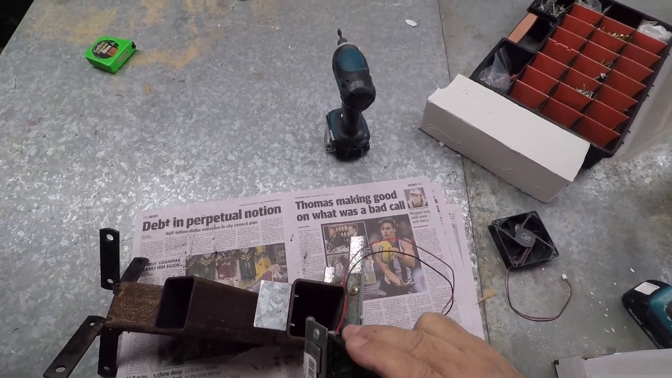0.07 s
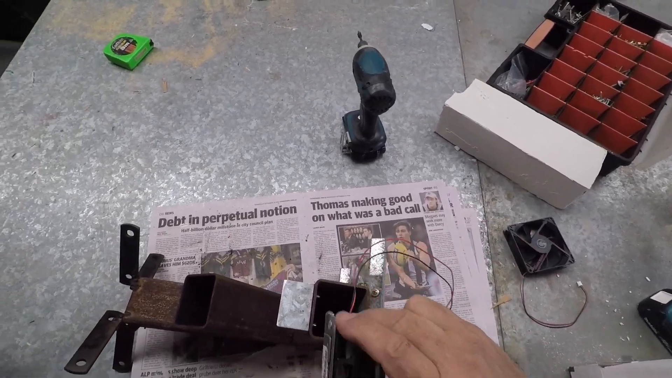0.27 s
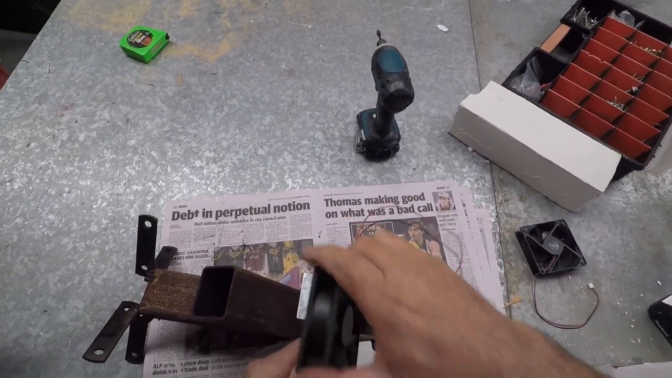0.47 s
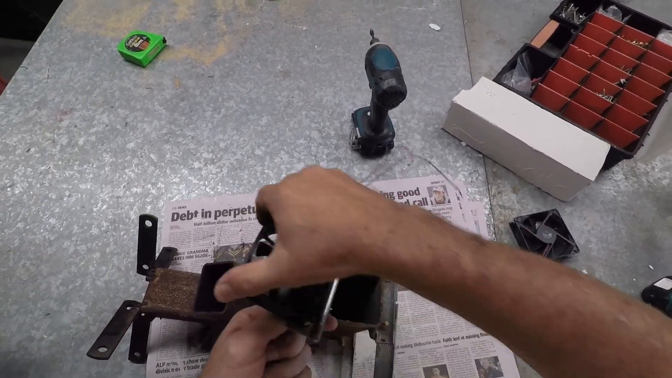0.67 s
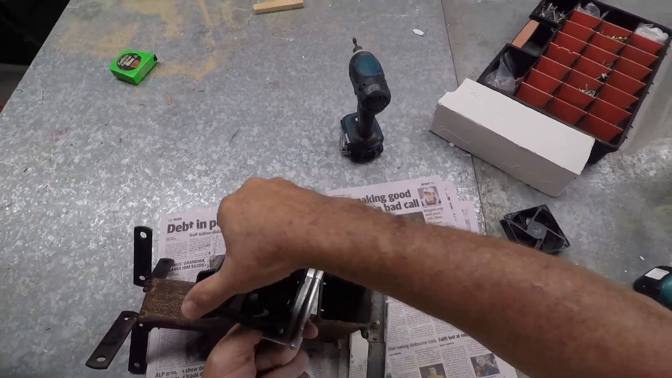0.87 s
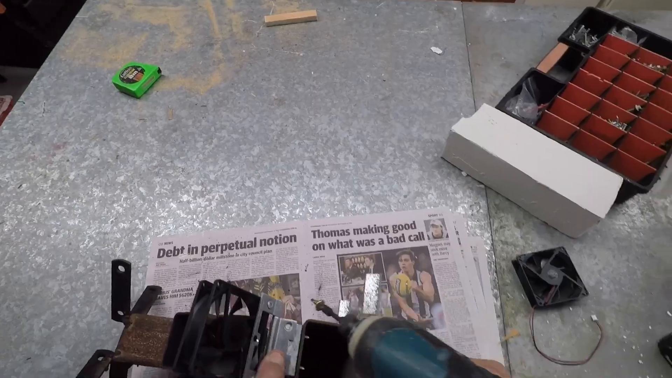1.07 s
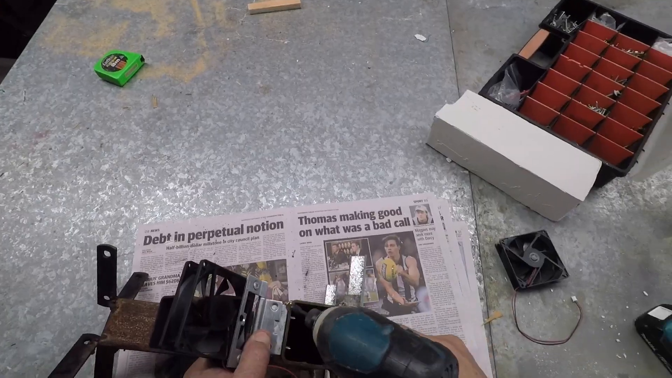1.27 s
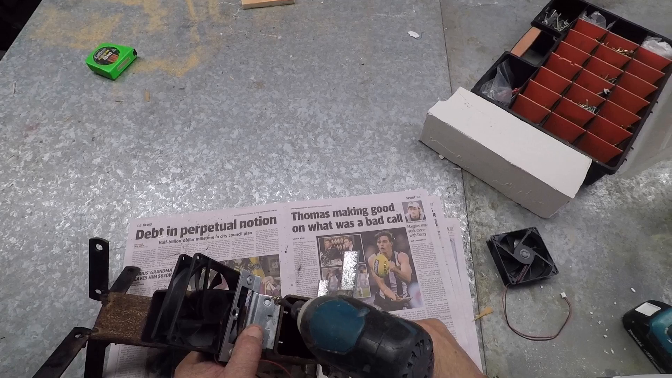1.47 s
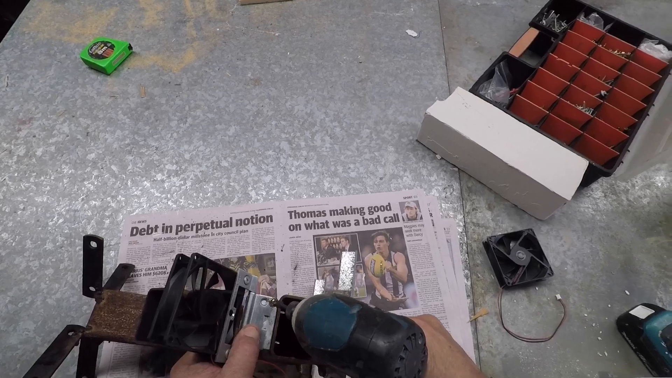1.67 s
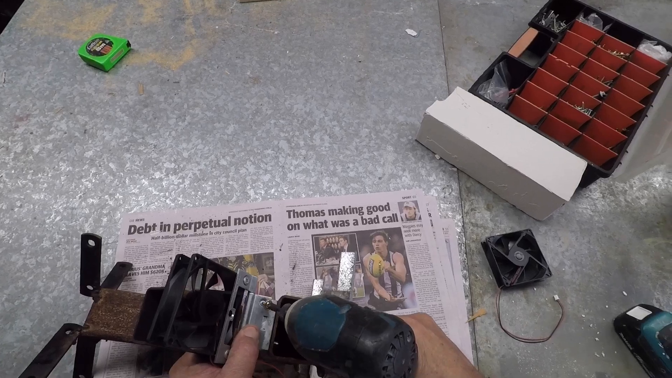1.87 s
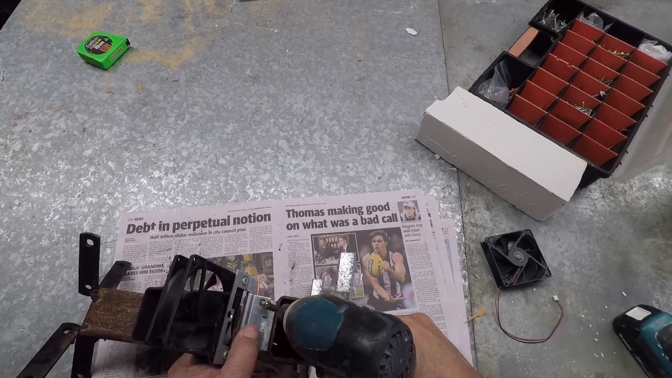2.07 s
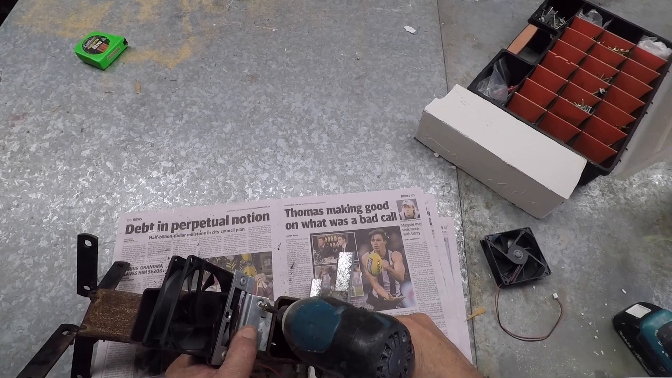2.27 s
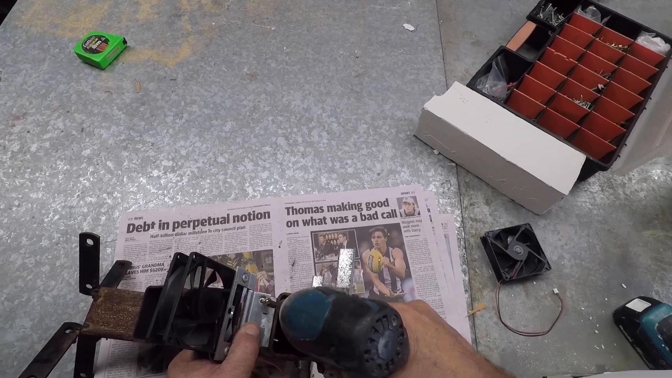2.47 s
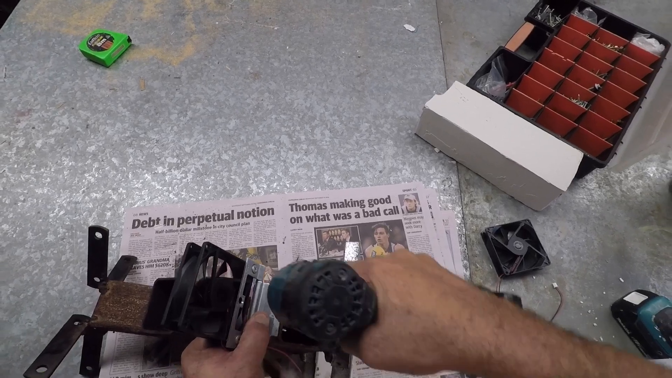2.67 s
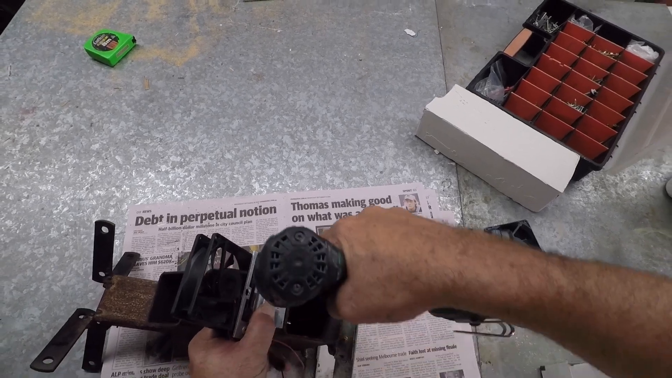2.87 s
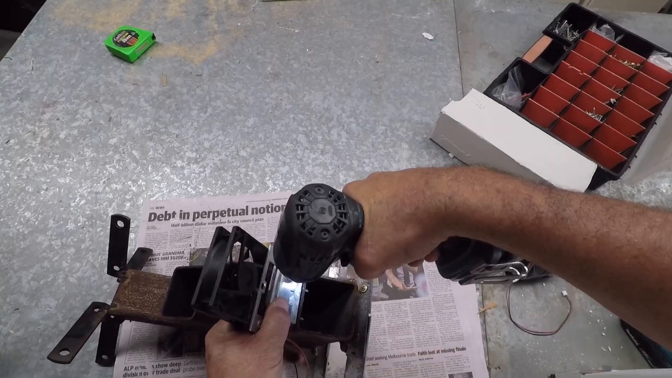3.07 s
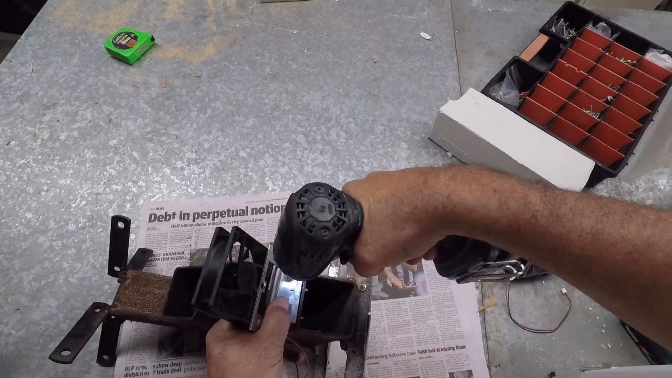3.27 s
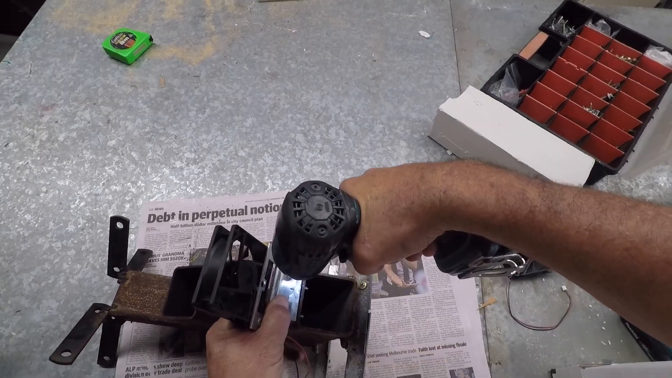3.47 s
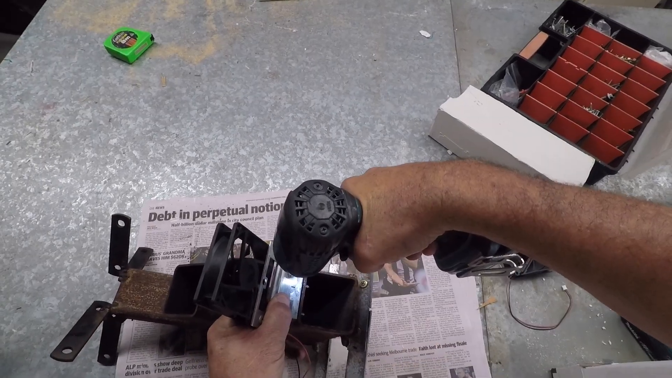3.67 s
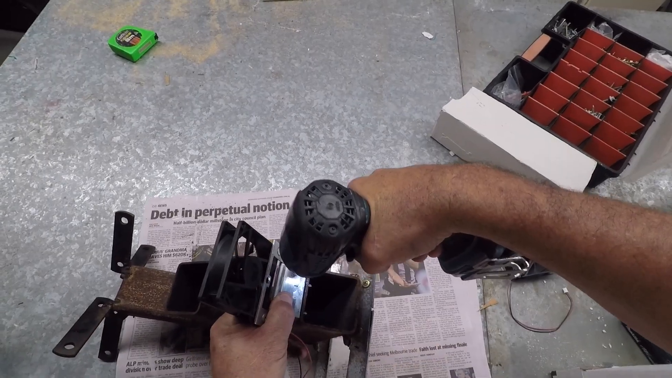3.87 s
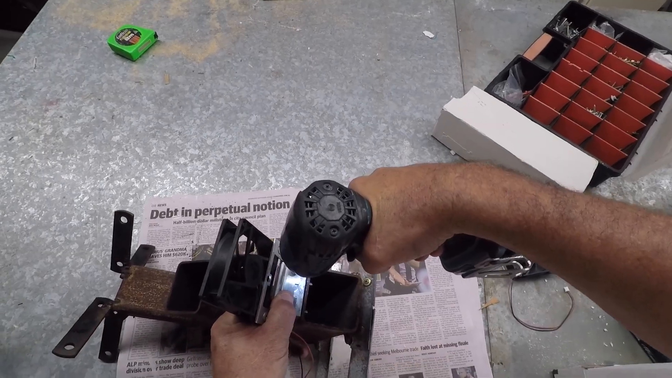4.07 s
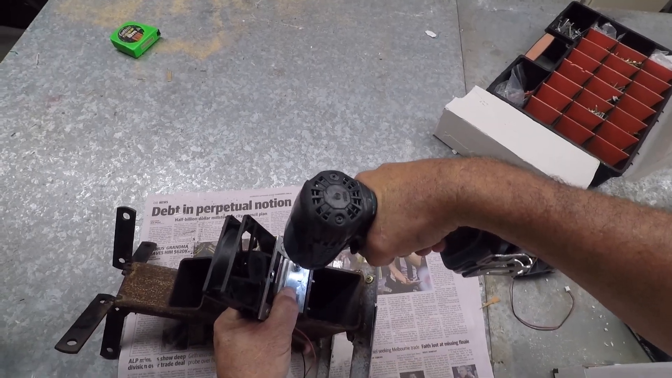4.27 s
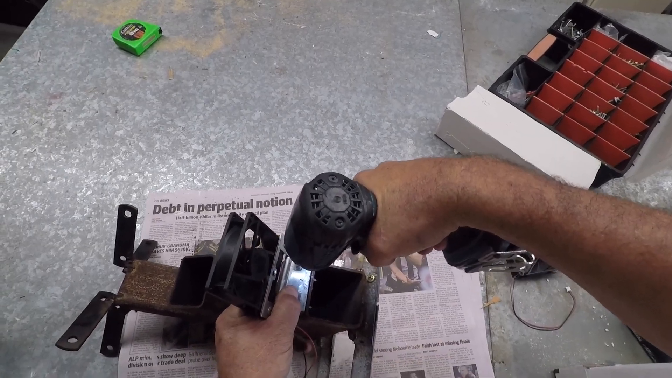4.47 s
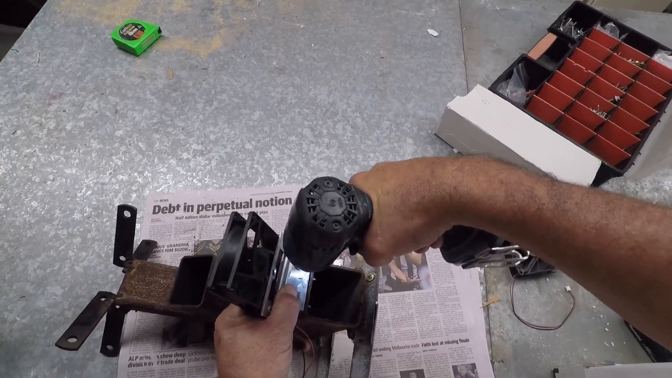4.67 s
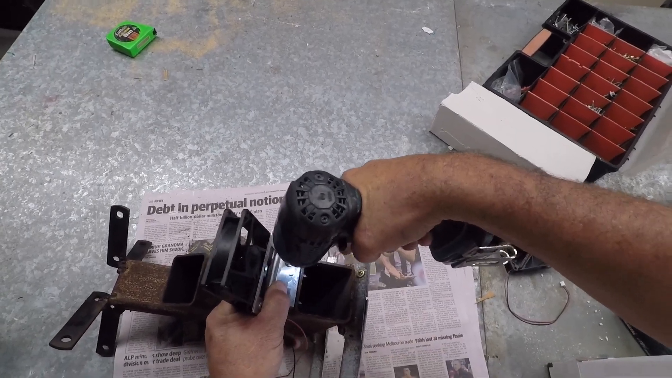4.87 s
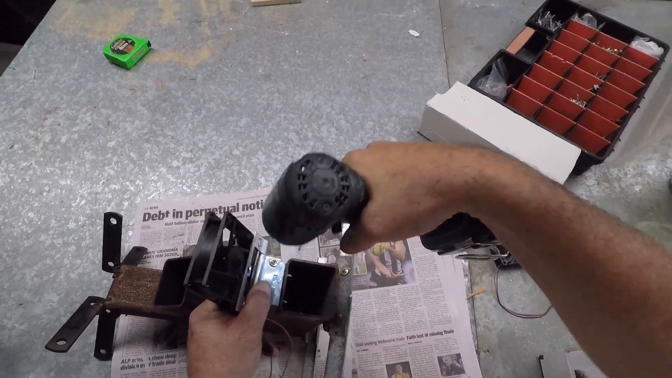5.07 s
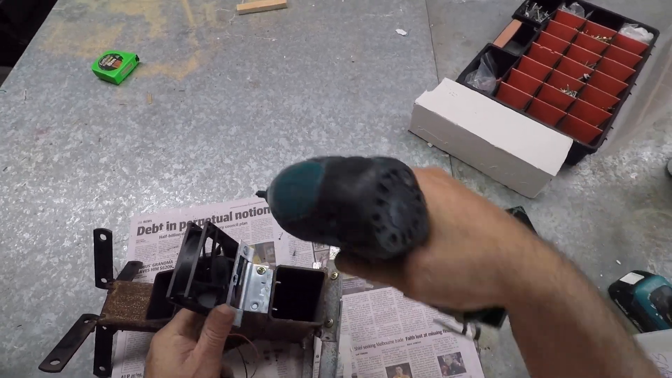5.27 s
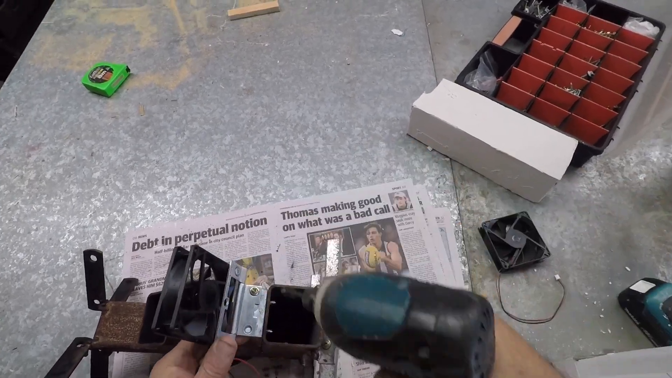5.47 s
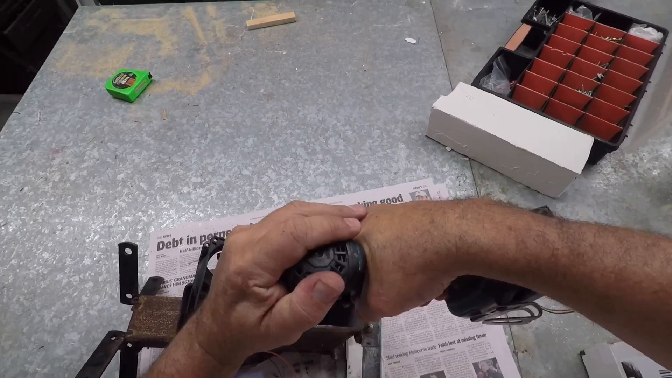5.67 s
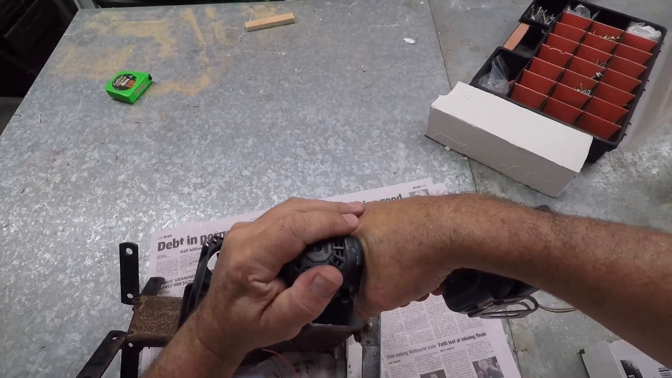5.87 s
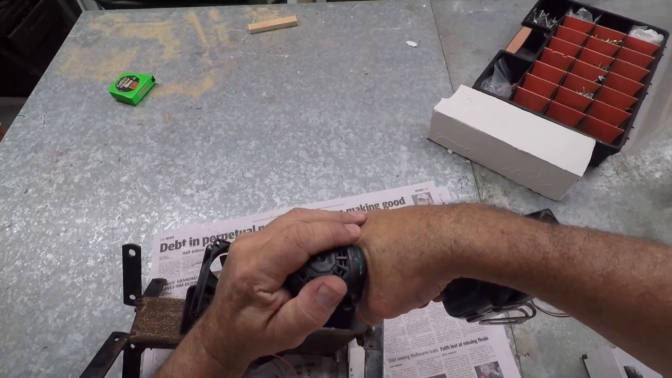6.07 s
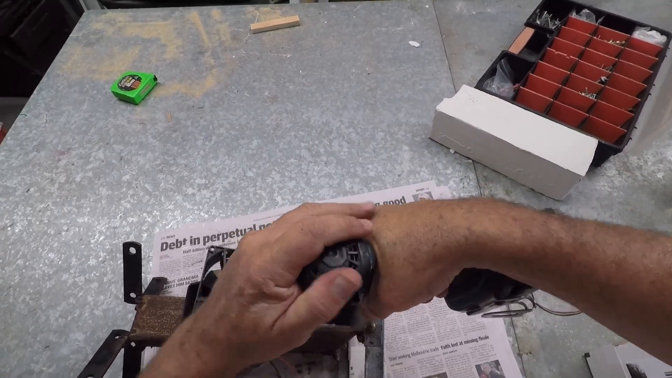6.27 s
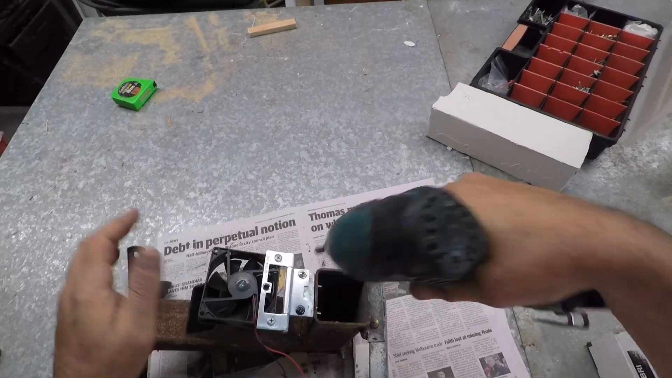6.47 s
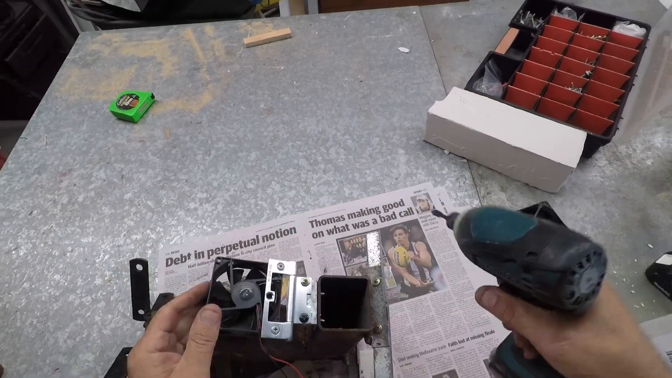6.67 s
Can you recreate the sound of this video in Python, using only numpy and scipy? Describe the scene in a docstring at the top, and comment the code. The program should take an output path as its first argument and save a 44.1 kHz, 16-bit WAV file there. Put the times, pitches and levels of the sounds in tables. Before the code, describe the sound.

Over a low hum of workshop air come a tiny motor blip and a faint tick. A cordless impact driver then whines for nearly two seconds, sagging under load and ending in a quick metallic hammering as the screw seats in a steel hinge. After a few light clicks, a second, shorter run strains, speeds up and hammers tight. The microphone is close to the bench.

```python
"""Impact driver at a workbench

A small workshop with a low hum of air, the stereo microphone close to the bench. After a snatch of
motor sound, a cordless impact driver drives two screws into a steel hinge. The motor whines and sags
under load while its gears grow louder; as each screw seats, the hammer strikes, the steel rings and
the bench booms. All sits in the centre, with only the top treble of the reflections spreading wide."""
import sys
import numpy as np
from scipy import signal
from scipy.fft import rfft, irfft, next_fast_len
from scipy.io import wavfile

SR = 44100
rng = np.random.default_rng(int(sys.argv[2]) if len(sys.argv) > 2 else 0)


def store_wav(level_fs):
    """Save 16-bit WAV to argv[1]."""
    pcm = np.round(np.clip(np.atleast_2d(level_fs), -1, 1) * 32767)
    wavfile.write(sys.argv[1], SR, pcm.T.astype(np.int16))


N = 296307
TIME = np.arange(N) / SR

# One trigger pull a screw: start_s, seat_s, release_s, then the base levels
# whir_db, whine_db, fan_db, gear_db, shudder_db
TRIGGER_PULLS = [(2.985, 4.59, 4.79, -20.5, -39.5, -30.5, -22, -27.5),
                 (5.588, 6.073, 6.205, -21, -42, -27, -21.5, -32)]
# Resonances of the driver's housing, main one first: pitch_hz, width_hz, relative_db
HOUSING_RESONANCES = [(4350, 400, -38), (9950, 400, -50)]
# Spectrum of a hard contact: frequency_hz, relative_db
CRACK_SPECTRUM = [(200, -29), (700, -2.5), (1600, 7.5), (3000, 0), (4300, 8.5), (6200, -2), (8000, -6),
                  (11000, -17), (15500, -11.5)]
# Modes of the steel hinge: pitch_hz, relative_db, t60_s
HINGE_MODES = [(1740, 9, 0.018), (2015, 8.5, 0.23), (2560, -1, .08), (3190, -5, 0.163), (3580, 4, .06),
               (3930, -4, .05), (4150, 17, 0.18), (4870, -16, 0.13), (4780, 12, 0.051), (5230, -1, .05),
               (6720, -38, .08)]


def gain_of(db):
    """Decibels to a factor."""
    return 10 ** (np.asarray(db) / 20)


def unit_rms(x):
    """Scales to rms 1."""
    return x / np.sqrt(np.mean(x ** 2) + 1e-20)


def value_at(points, hz):
    """Interpolates a table on a log-frequency axis."""
    table_hz, values = np.transpose(points)
    return np.interp(np.log(hz + 1), np.log(table_hz + 1), values)


def coloured(x, spectrum):
    """Filters by a spectrum table."""
    size = next_fast_len(N + 4096)
    response = gain_of(value_at(spectrum, np.fft.rfftfreq(size, 1 / SR)))
    return irfft(rfft(x, size) * response, size)[:N]


def noise(spectrum):
    """Noise of rms 1 with this spectrum."""
    return unit_rms(coloured(rng.standard_normal(N), spectrum))


def wander(rate_hz):
    """A smooth random curve of rms 1."""
    return unit_rms(np.interp(TIME * rate_hz, np.arange(8000), rng.standard_normal(8000)))


def bump(at, width, centre):
    """A bell curve of height 1."""
    return np.exp(-((at - centre) / width) ** 2)


def strike(times_s, db, response):
    """Sets off the same response at each time."""
    impulses = np.zeros(N)
    impulses[np.round(np.asarray(times_s) * SR).astype(int)] = gain_of(db)
    return signal.oaconvolve(impulses, response)[:N]


def decay(t60_s):
    """Half a second of exponential decay."""
    return gain_of(-60 * TIME[:SR // 2] / t60_s)


def ring(modes):
    """A struck body rings as a sum of dying sines."""
    age_s = TIME[:SR // 2]
    return sum(gain_of(db) * decay(t60_s) * np.sin(2 * np.pi * hz * age_s) for hz, db, t60_s in modes)


def tones(cycles, levels_db, flutter=.15):
    """Harmonics locked to a shaft, each fluttering in strength; rms near 1."""
    weights = gain_of(levels_db) / np.linalg.norm(gain_of(levels_db))
    position = np.arange(len(cycles)) * 160 / SR  # 160 new strengths a second
    shivers = rng.standard_normal((len(weights), 1024))
    total = 0
    for k, (weight, shiver) in enumerate(zip(weights, shivers), 1):
        strength = weight * (1 + flutter * np.interp(position, np.arange(1024), shiver))
        total += strength * np.sin(2 * np.pi * (k * cycles + rng.random()))
    return np.sqrt(2) * total


def room_air():
    """The hum of air dips briefly after the blip, sinks under each screw and creeps back."""
    # Workshop air: frequency_hz, relative_db
    air_spectrum = [(18, -44), (30, -31), (80, -34), (104, -41), (138, -2.5), (202, -1.5), (243, -9),
                    (307, -9.5), (389, -12.5), (420, -14.5), (505, -17.5), (1140, -24.5), (1330, -24),
                    (2800, -34), (5500, -35.5), (10200, -35), (15500, -44)]
    sink_db, recover_db_per_s = -14.5, 11.5
    level_db = -48.5 - 32 * bump(TIME, width=0.013, centre=0.98)
    for start_s, _, release_s, *_ in TRIGGER_PULLS:
        recovered_db = recover_db_per_s * np.maximum(TIME - release_s, 0)
        level_db += (TIME > start_s) * np.minimum(sink_db + recovered_db, 0)
    return gain_of(level_db) * noise(air_spectrum)


def handling_rumble():
    """Handling makes spells of low, uneven rumble."""
    # Rumble: frequency_hz, relative_db
    rumble_spectrum = [(15, 4.5), (40, -0.5), (100, -2.5), (140, -10), (220, -14.5), (500, -26),
                       (1500, -29.5), (4500, -39), (8000, -51)]
    # Spells of handling: start_s, end_s, level_db
    spells = [(0, .96, -62), (3.003, 6.718, -37.5)]
    level = sum(gain_of(db) * ((TIME >= start_s) & (TIME < end_s)) for start_s, end_s, db in spells)
    return level * gain_of(2 * wander(19)) * noise(rumble_spectrum)


def workshop_reflections(x):
    """Dense reflections from bench and walls, each band dying at its own speed."""
    # Reverberation of the room: frequency_hz, t60_s
    decay_times = [(100, 1), (400, 0.5), (1500, 0.4), (4500, 0.38), (9000, 0.18), (15000, 0.44)]
    size = SR // 2
    echoes = rng.standard_normal(size) * (rng.random(size) < .1) * (TIME[:size] > .004)
    hz, age_s, bands = signal.stft(echoes, SR, nperseg=256)
    fade = gain_of(-60 * age_s / value_at(decay_times, hz)[:, None])
    tail = signal.istft(bands * fade, SR, nperseg=256)[1]
    return signal.oaconvolve(x, tail / np.linalg.norm(tail))[:N]


def ticks():
    """Light contacts of trigger, bit and steel: a click and a damped ring."""
    # Contacts: start_s, relative_db
    contacts = [(0.95, -48), (1.905, -49), (2.962, -73), (4.892, -36), (4.92, -40), (5.022, -59),
                (5.076, -56), (5.561, -50.5), (6.355, -59), (6.421, -48.5), (6.671, -56)]
    start_s, db = np.transpose(contacts)
    click = noise(CRACK_SPECTRUM) * strike(start_s, db + 7, decay(t60_s=0.021))
    return click + strike(start_s, db - 20, ring(HINGE_MODES) * decay(t60_s=0.035))


def bench_boom(blows):
    """The blows pass through the vice into the bench top, a moment later."""
    # Modes of the bench: pitch_hz, relative_db, t60_s
    bench_modes = [(82.2, -11, 0.55), (116, 4, 0.099), (138.6, 0.5, 0.32), (181.6, -1.5, 0.33),
                   (225.4, -4.5, 0.14), (392, -8.5, 0.14), (620, -7, 0.12), (818.6, -8, 0.16)]
    # How well the bench radiates: frequency_hz, gain_db
    radiation = [(10, -26), (45, -19), (80, 2), (250, -2.5), (600, -7)]
    start_s, _, _, boom_db = blows
    return gain_of(-5) * coloured(strike(start_s + 0.00425, boom_db, ring(bench_modes)), radiation)


def driver_noises():
    """Brushes and fan air in the housing, the shaken bench, shaft drift and play in the gear teeth."""
    # Brushes and fan air: frequency_hz, relative_db
    whir_spectrum = [(120, -12), (280, -12), (450, -7.5), (650, -2), (950, -12), (1600, 1), (2400, -5.5),
                     (3000, -0.5), (3800, 1), (5100, 0.5), (6600, 1), (7500, -12), (9000, -17),
                     (13000, -16), (15500, -7)]
    # The shaken bench: frequency_hz, relative_db
    shake_spectrum = [(10, -9), (27, 7.5), (45, -18), (75, -6.5), (110, -1.5), (170, 0), (230, -14.5),
                      (400, -34), (1500, -79)]
    whir = noise(whir_spectrum)
    for hz, width_hz, db in HOUSING_RESONANCES:
        b, a = signal.iirpeak(hz, hz / width_hz, SR)
        band = signal.lfilter(b, a, signal.lfilter(b, a, rng.standard_normal(N)))
        whir += gain_of(db + 26) * unit_rms(band)
    drift, backlash = .0012 * wander(45), .006 * wander(260)
    return whir * gain_of(wander(120)), noise(shake_spectrum), drift, backlash


def bearing_rattle(cycles):
    """The bearings rattle in narrow bands that rise and fall with the shaft."""
    # Rattle bands: commutator_multiple, width_hz, over_whir_db
    bands = [(1.89, 340, -8), (1.53, 200, -15), (1.27, 160, -17)]
    phase = 2 * np.pi * cycles
    return sum(gain_of(db) * (wander(width) * np.cos(k * phase) + wander(width) * np.sin(k * phase))
               for k, width, db in bands)


def motor(gains, commutator_hz, timbre, noises, wobble, buzz_db):
    """One run, every tone geared to the motor: returns the airborne sound and the bench's shudder."""
    # Thin whistles of the brushes: commutator_multiple, over_whir_db
    whistles = [(5, -27), (6, -31), (8, -29)]
    # Spindle harmonics 1-13: relative_db
    spindle_db = [-1.5, -2.5, -4, -10.5, 2, -8.5, -16.5, -14, -11, -41, -19.5, -21, -18]
    rotor_ratio, fan_ratio, mesh_ratio, spindle_ratio = 1 / 8, 5 / 8, .607, .01196  # to the commutator
    running = gains[0] > 1e-5
    whir, shake, drift, backlash = (x[running] for x in noises)
    whir_gain, whine_gain, fan_gain, gear_gain, shudder_gain = gains[:, running]
    whine_db, gear_db = timbre
    hz = commutator_hz[running] * (1 + drift)
    cycles = np.cumsum(hz) / SR
    phase = 2 * np.pi * cycles
    mesh_cycles = mesh_ratio * np.cumsum(hz * (1 + backlash)) / SR  # play blurs the gear tones

    rattle = bearing_rattle(np.cumsum(commutator_hz) / SR)[running]
    whistle = sum(gain_of(db) * np.sin(k * phase) for k, db in whistles)
    rush = (whir + rattle + whistle) * (1 + 0.089 * np.sin(rotor_ratio * phase))
    whine = tones(cycles, whine_db)
    fan = tones(fan_ratio * cycles, [0])
    binding = 1 + wobble * np.sin(2 * spindle_ratio * phase)  # a wobbling bit binds twice a turn
    gears = binding * tones(mesh_cycles, gear_db, flutter=.65)
    buzz = gain_of(buzz_db) * np.sin(phase)  # the brushes buzz more as the gears take load
    paths = np.zeros((2, N))
    paths[0, running] = (whir_gain * rush + whine_gain * whine + fan_gain * fan
                         + gear_gain * (gears + buzz))
    paths[1, running] = shudder_gain * (tones(spindle_ratio * cycles, spindle_db) + gain_of(-2.5) * shake)
    return paths


def motor_blip(noises):
    """A 20 ms snatch of motor sound that starts at once, fades ever faster and cuts off."""
    # Opening levels: whir_db, whine_db, fan_db, gear_db, shudder_db
    levels_db = (-29, -27.5, -39.5, -45, -48)
    # A row of commutator harmonics 1-8, a row of gear mesh harmonics 1-6: relative_db
    timbre = [(0, -3, 1, -14, -19, -14, -16, -22), (-13, 7, -3, -11, 4, -14)]
    start_s, length_s, fade_db, commutator_hz = 0.96, 0.02, -21, 1814
    progress = (TIME - start_s) / length_s
    envelope = gain_of(fade_db * np.clip(progress, 0, 1) ** 2) * ((progress >= 0) & (progress < 1))
    gains = gain_of(levels_db)[:, None] * envelope
    return motor(gains, np.full(N, commutator_hz), timbre, noises, wobble=0, buzz_db=-2).sum(axis=0)


def screw_gains(pull, commutator_hz):
    """Strength of whir, whine, fan, gears and shudder, from the trigger and the motor's speed."""
    start_s, seat_s, release_s, *levels_db = pull
    attack_s, coast_db_per_s, no_load_hz = 0.029, 211, 2320
    spin_up_db = -14 * np.clip(1 - (TIME - start_s) / attack_s, 0, 1)
    coast_db = -coast_db_per_s * np.maximum(TIME - release_s, 0)
    trigger = (TIME >= start_s) * gain_of(spin_up_db + coast_db)
    speed = commutator_hz / no_load_hz
    load = np.tanh((1 - speed).clip(0) / 0.13)  # the gear teeth bear harder as speed is lost
    # The whine swells when its second or third harmonic nears the housing's main resonance.
    nearness = sum(bump(k * commutator_hz, width=550, centre=HOUSING_RESONANCES[0][0]) for k in (2, 3))
    swell = gain_of(16.5 * nearness)
    # While the hammer works, the tones drop and the shudder builds.
    drop = gain_of(-13.5 * (TIME > seat_s))
    build_db = 39 * np.clip(TIME - seat_s, 0, release_s - seat_s)
    jolt_db = 12.6 * bump(TIME, width=.022, centre=5.938)  # the second screw breaks free
    shudder = gain_of(build_db + jolt_db)
    strengths = [speed ** 0.93, drop * swell, drop * speed ** 3.1, drop * load * speed ** 2.58, shudder]
    return gain_of(levels_db)[:, None] * trigger * np.array(strengths)


def drive_screws(noises):
    """The motor sags as the first screw goes in; the second screw binds, then breaks free."""
    # Motor speed on each screw: time_s, commutator_hz
    first_speed = [(3.0, 2320), (3.154, 2277), (3.19, 2246), (3.344, 2270), (3.518, 2237), (3.788, 2258),
                   (3.938, 2205), (4.302, 2157), (4.346, 2100), (4.364, 2156), (4.452, 2128), (4.482, 2004),
                   (4.496, 2077), (4.544, 1982), (4.566, 1971), (4.59, 1899)]
    second_speed = [(5.6, 1711), (5.834, 1583), (5.862, 1473), (5.9, 1489), (5.918, 1754), (5.95, 1729),
                    (5.966, 1997), (6.008, 2106), (6.07, 1984)]
    # For each screw, a row of commutator harmonics 1-8, a row of gear mesh harmonics 1-6: relative_db
    first_timbre = [(-16.5, 0, -6.5, -28, -28.5, -20, -32, -34), (-5, -2.5, -0.5, -15, -2, -13)]
    second_timbre = [(-8, -4, -0.5, -9, -15, -22, -26, -19), (-2, 3.5, -6, 1.5, -5, -13)]

    def screw(pull, speed, timbre, wobble, buzz_db):
        hz = np.interp(TIME, *np.transpose(speed))
        return motor(screw_gains(pull, hz), hz, timbre, noises, wobble, buzz_db)

    return (screw(TRIGGER_PULLS[0], first_speed, first_timbre, wobble=0.2, buzz_db=0)
            + screw(TRIGGER_PULLS[1], second_speed, second_timbre, wobble=0.99, buzz_db=-15))


def hammer_blows():
    """Blows quicken once a screw seats, with less crack and more knock and boom as it tightens."""
    # Hammering on each screw: last_blow_s, first_gap_s, gap_shrink_s, crack_db, knock_db, boom_db
    bursts = [(4.83, .032, .0017, -12.5, -19.5, -12.5), (6.232, .026, 0.000088, -10, -14.5, -12.5)]
    tight_change_db, scatter_db = (-7, 3, 2), 1.6  # change by the last blow: crack, knock, boom
    blows = []
    for (_, seat_s, *_), (last_s, gap_s, shrink_s, *levels_db) in zip(TRIGGER_PULLS, bursts):
        gaps_s = gap_s - shrink_s * np.arange(10)
        start_s = seat_s + np.append(0, np.cumsum(gaps_s))
        start_s = np.append(start_s[start_s < last_s - gap_s / 2], last_s)  # last: the motor is coasting
        tightness = (start_s - seat_s) / (last_s - seat_s)
        chance_db = scatter_db * rng.standard_normal((20, 3))[:len(start_s)]
        blow_db = levels_db + np.outer(tightness, tight_change_db) + chance_db
        blows.append(np.vstack([start_s, blow_db.T]))
    return np.hstack(blows)


def hammer(blows):
    """Each blow cracks on the anvil, knocks the screw and rings the hinge, then rebounds more softly."""
    # Knock on the screw: frequency_hz, relative_db
    knock_spectrum = [(150, 1), (340, -2.5), (480, -6), (720, -3), (1050, -16.5), (1550, -1.5), (2200, -15),
                      (4000, -29), (9000, -52)]
    rebound_s, rebound_db = 0.0071, -4.5
    start_s, crack_db, knock_db, _ = blows
    hits_s = np.append(start_s, start_s + rebound_s)
    hits_db = np.append(crack_db, crack_db + rebound_db)
    crack = noise(CRACK_SPECTRUM) * strike(hits_s, hits_db, decay(t60_s=0.039))
    knock = noise(knock_spectrum) * strike(start_s, knock_db, decay(t60_s=0.06))
    return crack + knock + gain_of(-31.5) * strike(hits_s, hits_db, ring(HINGE_MODES))


def scene():
    """Tool, bench and air in the centre; top treble reflections spread between the microphone ports."""
    # A notch and a peak in the tool's top treble: frequency_hz, gain_db
    tool_colour = [(10300, 0), (11100, -5.5), (11600, -8), (12200, 6.5), (16000, -1.5)]
    # Stereo width: frequency_hz, side_over_mid_db
    stereo_width = [(20, -83), (5000, -73), (8000, -75), (11000, -16), (13000, -3.5), (16000, -16)]
    noises = driver_noises()
    whine, shudder = drive_screws(noises)
    blip = motor_blip(noises)
    blows = hammer_blows()
    tool = whine + hammer(blows) + ticks()
    airborne = coloured(tool + gain_of(-7.5) * workshop_reflections(tool) + blip, tool_colour)
    mid = airborne + shudder + bench_boom(blows) + room_air() + handling_rumble()
    side = coloured(workshop_reflections(mid), stereo_width)
    return np.array([mid + side, mid - side])


def record(dry):
    """The microphone's colour, a ceiling on the peaks, then the band limit."""
    # Microphone response: frequency_hz, gain_db
    microphone = [(1, -44.5), (12, -5.5), (22, 0), (11000, -1), (12200, -1), (16000, -12)]
    heard = np.clip([coloured(channel, microphone) for channel in dry], -.95, .95)
    lowpass = signal.firwin(511, cutoff=15600, window=("kaiser", 9), fs=SR)
    return signal.oaconvolve(heard, lowpass[None], "same", axes=1)


dry = scene()
out = record(dry)
store_wav(out)
```